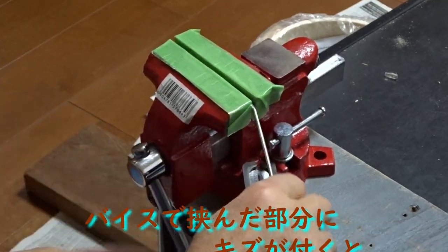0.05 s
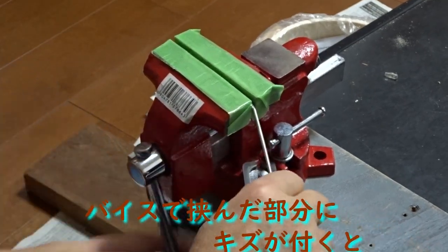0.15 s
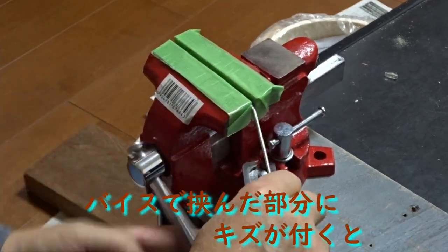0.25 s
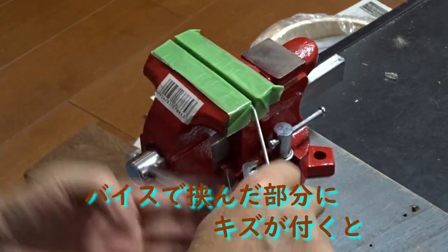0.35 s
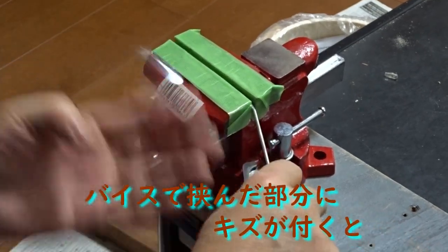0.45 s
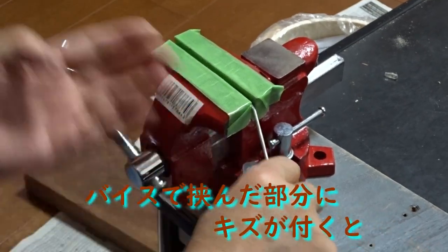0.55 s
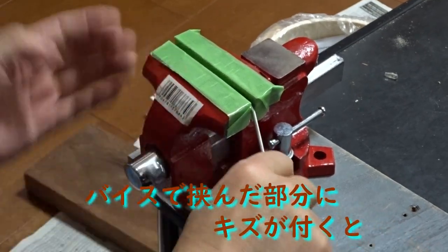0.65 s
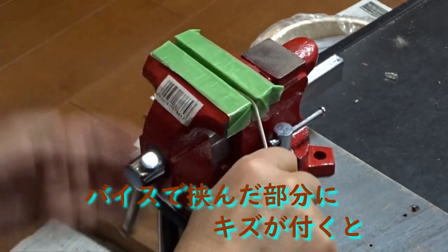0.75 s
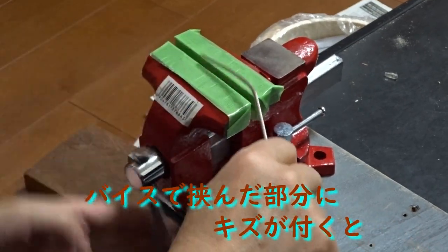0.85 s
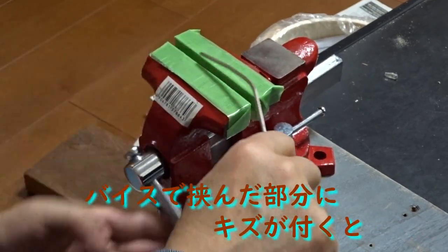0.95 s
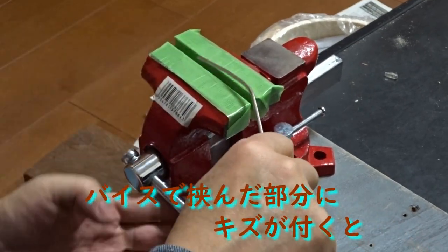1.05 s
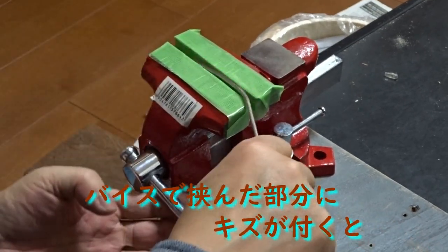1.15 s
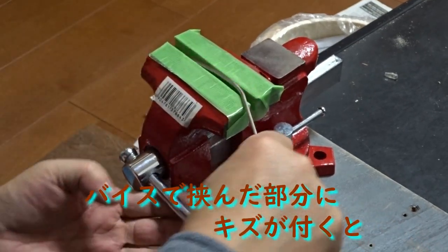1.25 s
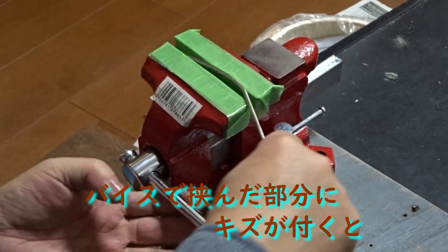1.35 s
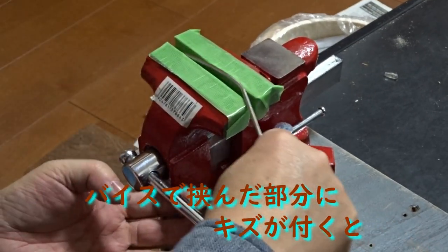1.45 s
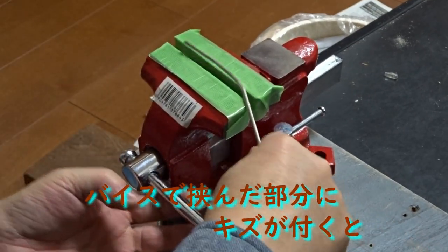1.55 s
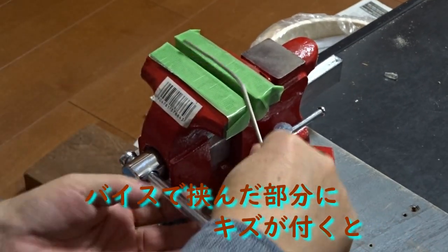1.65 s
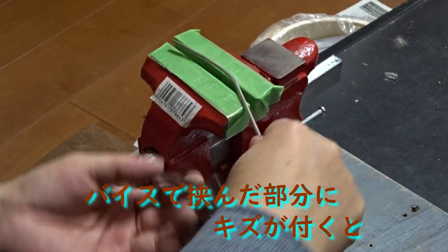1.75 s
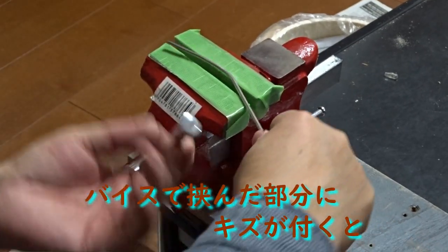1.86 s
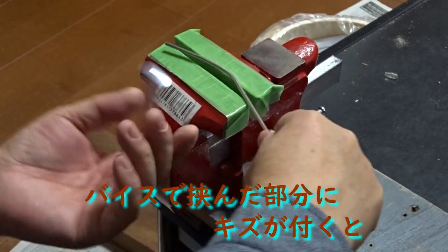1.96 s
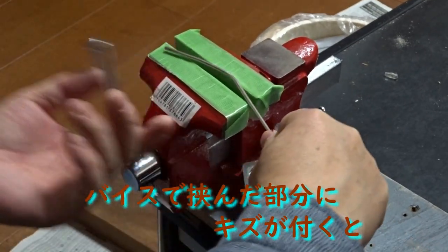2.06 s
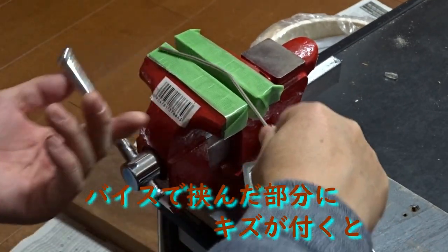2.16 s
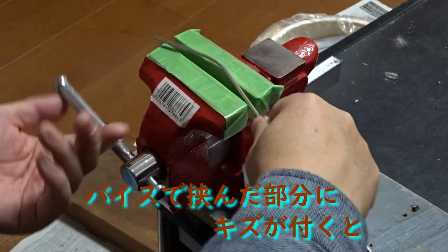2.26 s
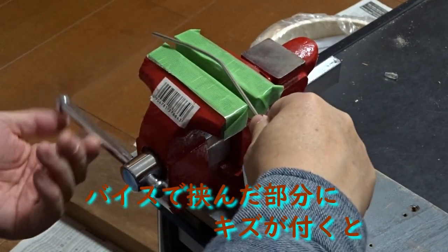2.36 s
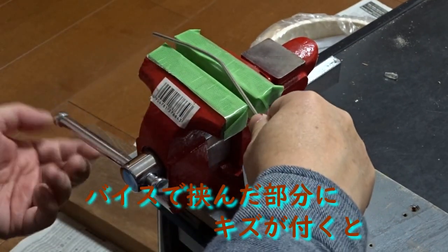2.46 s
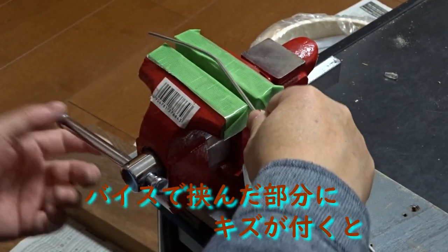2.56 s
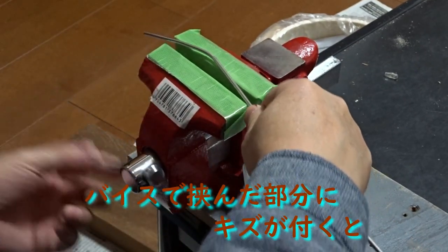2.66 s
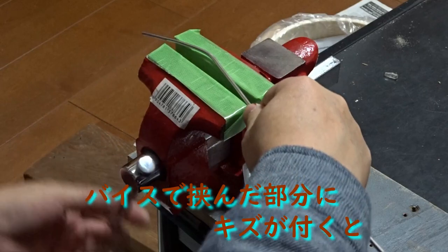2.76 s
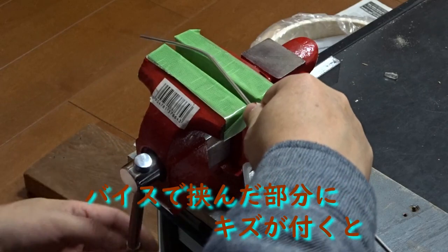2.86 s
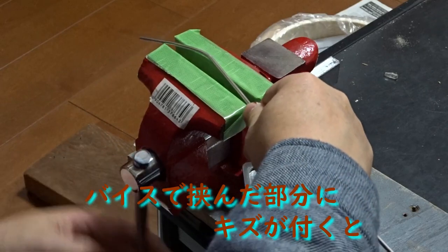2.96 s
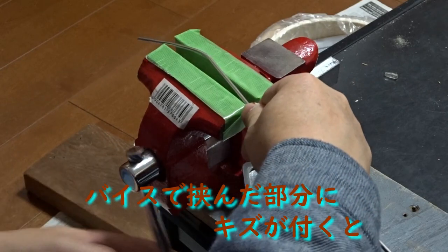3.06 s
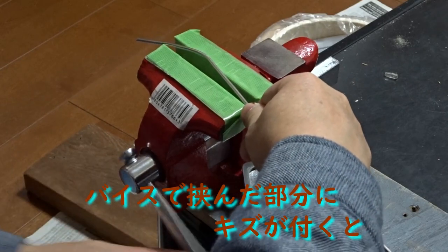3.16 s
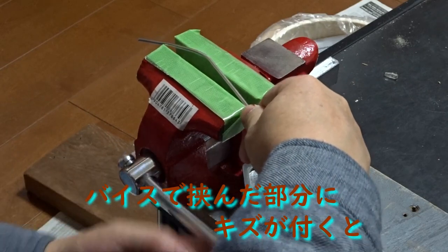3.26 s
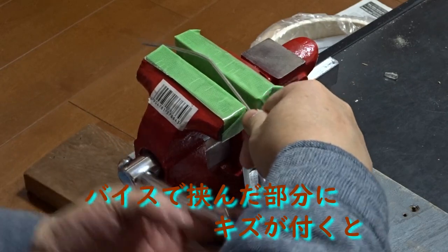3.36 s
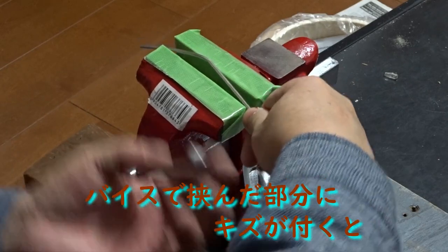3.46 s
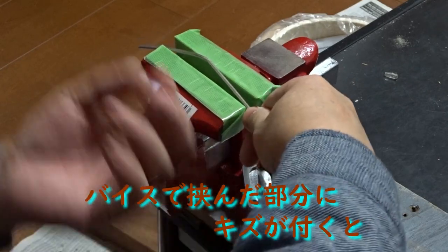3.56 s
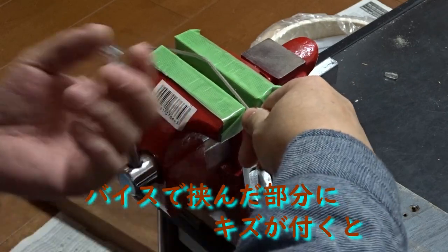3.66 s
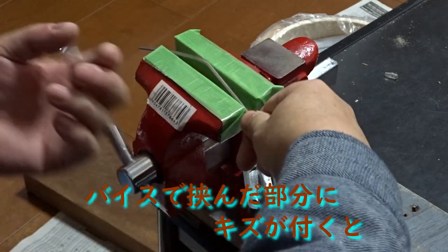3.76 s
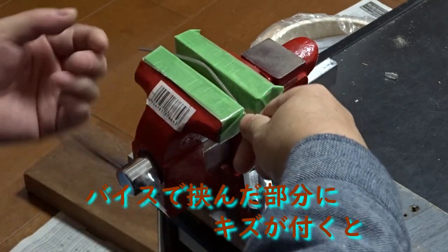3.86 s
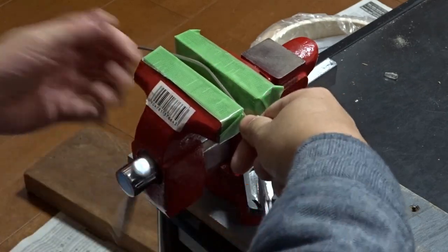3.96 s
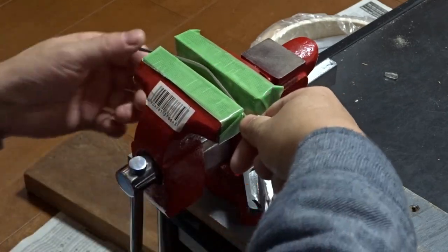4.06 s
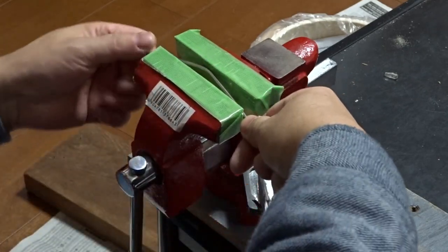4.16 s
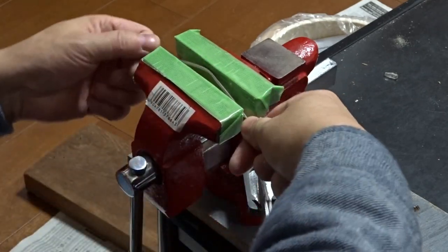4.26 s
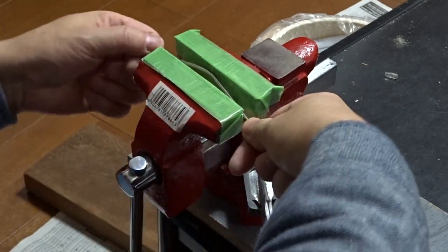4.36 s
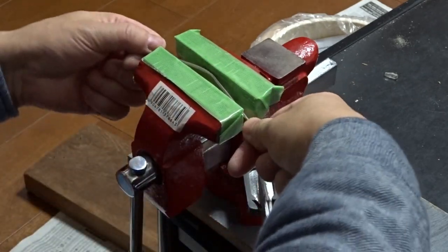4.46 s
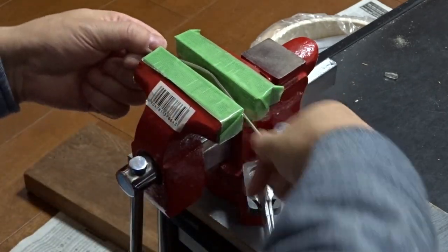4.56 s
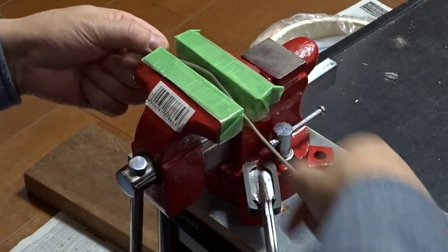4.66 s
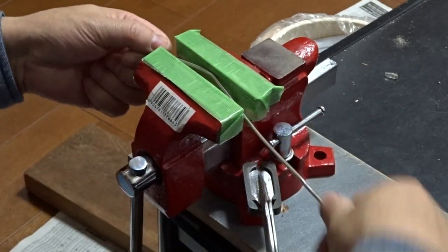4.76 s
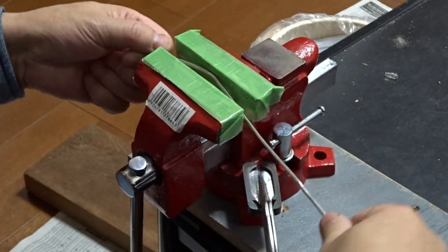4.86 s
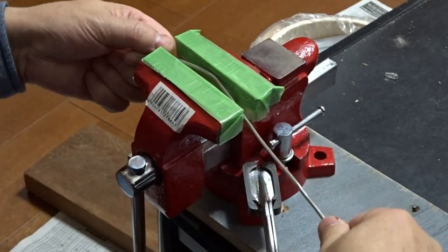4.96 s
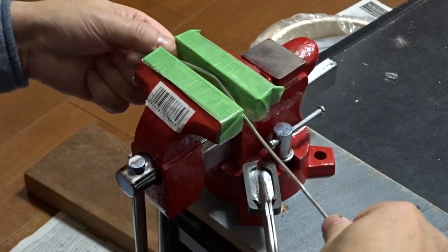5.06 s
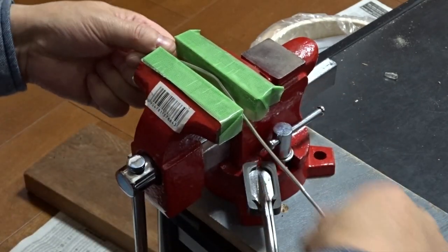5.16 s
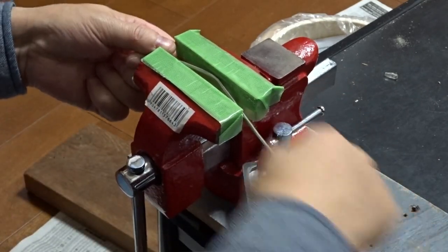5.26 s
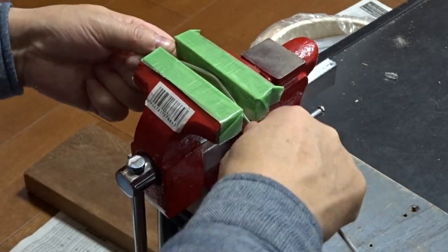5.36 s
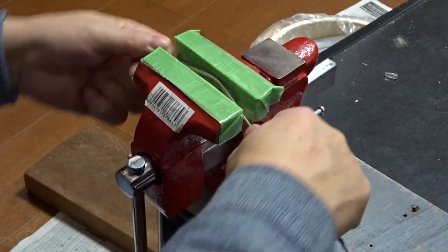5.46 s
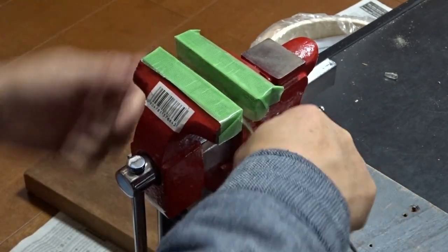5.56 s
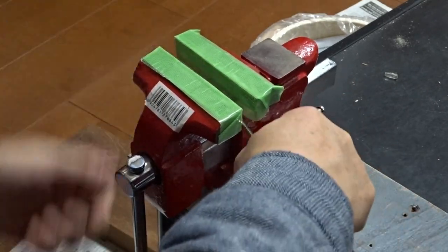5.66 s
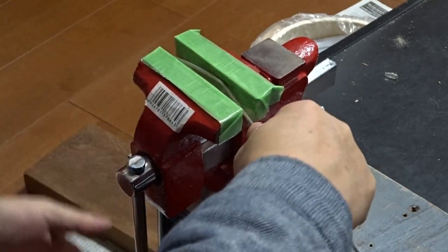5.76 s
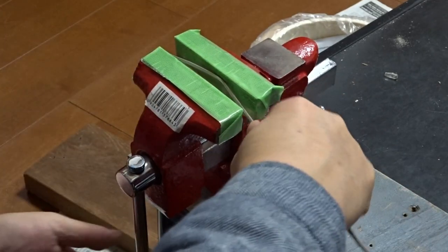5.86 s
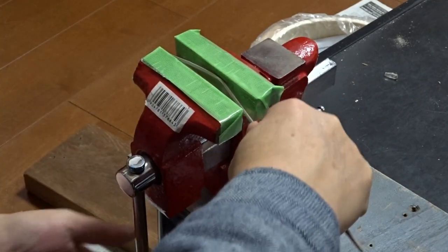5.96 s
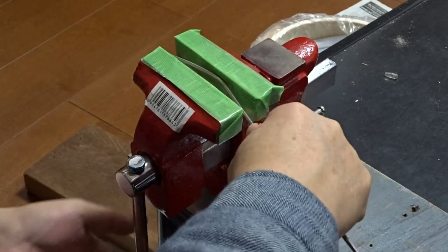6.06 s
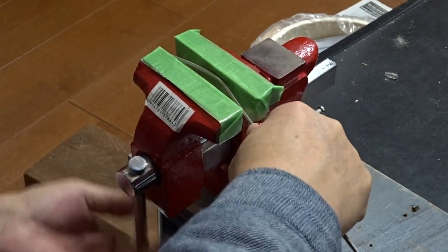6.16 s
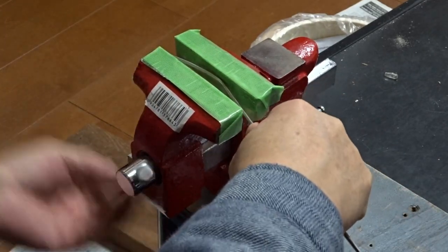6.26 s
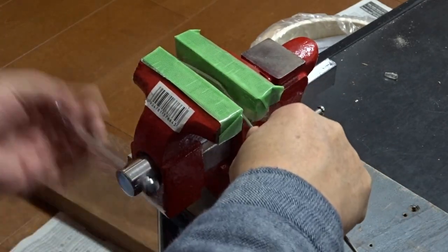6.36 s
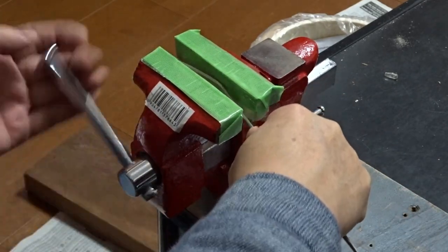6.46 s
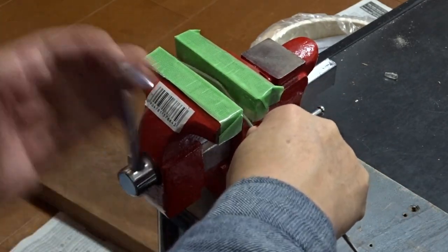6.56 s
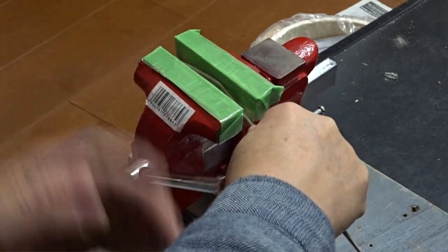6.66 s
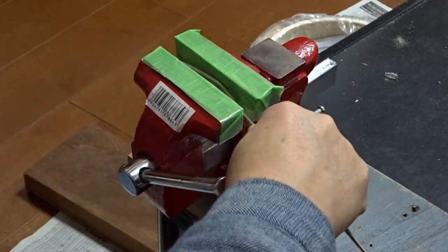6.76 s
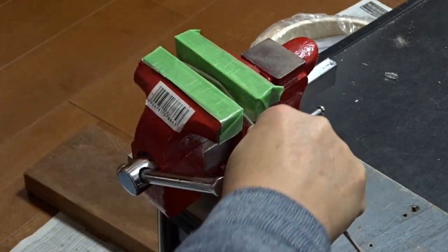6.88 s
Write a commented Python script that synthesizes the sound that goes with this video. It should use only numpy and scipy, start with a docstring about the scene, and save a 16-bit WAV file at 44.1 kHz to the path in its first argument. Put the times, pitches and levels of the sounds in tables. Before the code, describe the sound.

In a small workshop, a cast-iron bench vise is wound open and shut. Its loose steel handle slides and clinks brightly while the jaws knock and the screw grinds softly, shaking a wooden board. After scattered rattles comes a lull with a few thin wire ticks, then another quick flurry of clinks and knocks. The sounds are close, with a short room tail over a faint fan-like hiss.

```python
"""Small workshop: a cast-iron bench vise on a wooden board is wound open and shut.
Its loose steel handle slides and clinks in the screw head. Jaw knocks and the screw grinding in its
nut shake casting and board. A thin wire ticks on the jaws. All of these ring in a short room tail,
over quiet room noise, a narrow fan-like hiss and a thin high whine."""
import sys
import numpy as np
from scipy import signal
from scipy.fft import rfft, irfft
from scipy.io import wavfile
from scipy.ndimage import uniform_filter1d

SR = 44100
rng = np.random.default_rng(int(sys.argv[2]) if len(sys.argv) > 2 else 0)


def to_wav(sig):
    """Store sig (one row per channel, or 1-D mono) as 16-bit WAV at the path in sys.argv[1].

    Samples outside -1..1 are clipped; the rate is SR.
    """
    pcm = np.clip(np.atleast_2d(sig), -1, 1) * 32767
    pcm = np.round(pcm).astype(np.int16)
    wavfile.write(sys.argv[1], SR, pcm.T)  # frames by channels


N = 305303
EVENT_SAMPLES = 8192
STEREO_SIGN = np.array([[1], [-1]])  # left, right

# handle bar and screw head modes, in families low to high: f/Hz, level/dB, t60/s
BAR_MODES = [
    [(2247, -2.5, 0.053), (2512, -3, 0.088), (2770, -19, 0.023)],
    [(3600, -4.5, 0.079), (3764, 1, 0.065), (3844, 4.5, 0.065), (3930, 1.5, 0.06)],
    [(5820, -6, 0.0601), (6598, 4, 0.091), (6710, 5.5, 0.068), (7000, -4, 0.097)],
    [(7500, -1.5, 0.18), (7354, 5.5, 0.079), (7356, 2.5, 0.077), (7704, 4.5, 0.036), (8450, -24.5, 0.021)],
    [(11110, 3, 0.12), (11050, -1, 0.1), (11750, -6, 0.06)],
    [(12640, 2, 0.063), (12710, 5, 0.11), (12950, 0.5, .05)],
]
# handle clinks: t/s, level/dB, hardness/(dB/octave), spot on bar/-1..1, crack re blow/dB, t60 share
CLINKS = [(0.0, -40, -3, -0.027, -22, 1), (.0979, -30.5, -4, 0.68, -25, 0.78),
          (0.1207, -28.5, 4, 0.24, -38, 0.78), (0.1538, -39, 1, 0.99, -28, 0.75),
          (0.1849, -27, -3.5, 0.96, -26, 0.61), (.2039, -25, -2, 0.073, -30, 0.57),
          (0.3013, -40.5, -11.5, -.1, -11, .74), (0.3438, -27.5, -6.5, -.4, -23.5, 1),
          (0.352, -14, 5, -0.74, -22.5, 0.44), (0.367, -14.5, 7.5, .4, -22.5, 0.44),
          (0.3992, -18, 2.5, -0.00014, -31.5, 0.7), (0.4807, -17, -5.5, 1, -31, 0.35),
          (0.6643, -16, -0.5, 0.14, -23, 0.41), (.998, -55, 4.5, -0.15, -25.5, .65),
          (1.073, -27.5, 0.5, 0.16, -31.5, 0.84), (1.1166, -22.5, 14, -0.72, -20, 0.67),
          (1.1339, -26, 20, 0.18, -21, 0.37), (1.916, -32.5, -3.5, -0.16, -20.5, 0.46),
          (2.0768, -41, -0.5, -.6, -28.5, 0.74), (2.7676, -55.5, -2, -0.027, -16.5, 0.57),
          (2.9312, -55, 5, -0.46, -29.5, .69), (3.1333, -59, -2.5, -.3, -26, 0.7),
          (3.3548, -55, -16, -0.18, -18.5, .6), (3.5131, -41.5, -6, -0.18, -17.5, 1),
          (3.552, -36, -4, -0.035, -31, 0.89), (3.7973, -32.5, -1.5, -0.85, -23, 0.67),
          (3.907, -19, 4.5, -0.43, -23.5, 0.34), (3.9214, -27, -1, .7, -27.5, 0.78),
          (5.7167, -53, -9.5, .4, -7.5, .52), (6.142, -42, -8, -.1, -34, .65),
          (6.149, -33.5, -4, -.25, -29, 0.78), (6.1593, -22.5, 3.5, -0.48, -26, 1),
          (6.1769, -15, 0.5, -0.72, -33.5, 0.59), (6.2083, -32.5, 4, -0.17, -29, 0.55),
          (6.2522, -28, -5, -0.17, -20, 0.51), (6.28, -51, -1.5, -.2, -25, 0.58),
          (6.3292, -26, -3.5, -0.13, -27, 0.46), (6.3784, -39, -5, 0.73, -24, 0.74),
          (6.427, -31, 0.5, -0.81, -22.5, 0.41), (6.5286, -52.5, 7, -0.32, -20, 0.97),
          (6.566, -21.5, 6, 0.61, -22, 0.32), (6.5799, -24, -4.5, -0.16, -28, 0.5),
          (6.616, -41.5, -12, 0.2, -9, 0.62), (6.65, -46, -8, .01, -18, .65)]
# per bar family: level/dB; gain at spot +1/dB
BAR_FAMILY_DB = (-19, -17.5, -15.5, -12, -23.5, -24)
BAR_SPOT_DB = (3, -2.4, 8, -6.5, -1, 2.5)
# casting and board modes, in families low to high: f/Hz, level/dB, t60/s
BODY_MODES = [
    [(64.6, 1.5, 0.31), (97, -9, 0.06), (134, 8, 0.35)],
    [(185, 4.5, 0.18), (241.2, 3, 0.21)],
    [(285.4, 2, 0.09), (323.3, 6.5, 0.088), (362.8, 4, 0.18), (445.8, 2, 0.11)],
    [(517.7, 2.5, 0.098), (587.8, 7, 0.077), (655, 0, 0.12), (723.5, 5.5, 0.1)],
    [(843, 4, 0.061), (1005, 5.5, 0.014), (1244, 0, 0.072), (1445, 2, 0.098), (1548, 6.5, 0.066)],
]
# jaw knocks: t/s, level/dB, board boom/dB, jaw edge/dB, spot on casting, t60 share
KNOCKS = [(0.0, -30.5, 1.5, -3.5, -.1, 0.45), (.103, -31.5, -8, 11, -0.26, 0.52),
          (0.188, -28.5, -12, 0.5, -0.37, 0.66), (0.312, -19.5, -19, -3.5, -0.36, 0.41),
          (.348, -26.5, -17, 6.5, -1.4, 1), (.366, -15, -16, -4, -.6, 0.36),
          (.399, -27.5, -4, 3.5, -.9, 0.76), (0.498, -17, -5.5, -7.5, .8, 0.62),
          (.663, -28.5, 7, 17.5, -0.53, 0.33), (.801, -40, 15.5, 3.5, -0.35, 1),
          (.85, -35.5, 13.5, -6, 0.32, 0.57), (1.074, -47, 6, 9.5, -.7, 0.92),
          (1.12, -27, -8, 5.5, -0.024, 0.47), (1.69, -50, 2, -15, 1, 1),
          (1.918, -38.5, 13, 9.5, 0.75, 0.42), (2.02, -38, 1.5, 1.5, 0.22, .82),
          (2.089, -36, 3, 1.5, 0.24, 0.75), (2.768, -41.5, 6.5, 2, -0.23, 0.48),
          (2.931, -29.5, -3, 2.5, 0.98, 0.48), (2.956, -27.5, 6.5, -9.5, 0.48, 0.7),
          (3.135, -32.5, -3.5, -10, 0.11, 0.67), (3.351, -31, -1, -3, -0.35, 0.48),
          (3.55, -34, -4.5, 2, 0.67, 0.93), (3.8, -24.5, -1, -0.5, -0.051, 0.84),
          (3.909, -23, -16, 5.5, -0.7, 0.46), (4.865, -46, 1, -6.5, 1, 1), (5.718, -33, 10, 4, -0.66, 0.91),
          (6.153, -40, -1, 0, 0.96, 0.92), (6.178, -28.5, -4, -0.2, .6, 0.68),
          (6.204, -27, 0, 3, 0.35, 0.67), (6.243, -25, -6, 3.5, 1, 0.67),
          (6.329, -33.5, -32, -3.5, -0.65, 0.97), (6.424, -27.5, 1, 0, -0.04, 0.45),
          (6.528, -42, -4, 2.5, .9, .98), (6.577, -23.5, -3, -7, 0.9, .62), (6.619, -29, 2, -0.5, -0.45, 1)]
# per body family: knock level/dB, gain at spot +1/dB; shares of boom and edge; screw drive/dB
BODY_FAMILY_DB, BODY_SPOT_DB = (-27, -17, -13, -9, -14.5), (-1.8, 0, 4, -2, 3.1)
BOOM_SHARE, EDGE_SHARE = (1, 0.74, 0.17, 0.029, -0.064), (-0.45, -0.1, -0.22, 0.021, 0.93)
GRIT_DB = (-14.5, 1.5, 0.5, 1.5, -6.5)
# screw grinding envelope: t/s, relative level/dB
SCREW_ENVELOPE = [(0, -63), (.1, -52), (0.366, -46), (0.491, -39.5), (0.746, -71), (.864, -49.5),
                  (1.028, -73), (1.7, -72), (2.04, -53), (2.12, -48), (2.26, -70.5), (2.55, -73),
                  (2.706, -53.5), (2.838, -66.5), (3.146, -59), (3.6, -57), (3.8, -50), (4.15, -71),
                  (6.212, -79), (6.344, -45.5), (6.6, -49.5), (6.8, -61.5)]
# room and microphone noise spectrum: f/Hz, relative density/dB
AIR_SPECTRUM = [(15, -43.5), (25, -1.5), (405, -0.5), (1040, -7.5), (1190, -8.5), (1560, -3), (1740, -1),
                (2000, -7), (2840, -15), (14800, -21.5), (16000, -28)]
# hiss resonances: f/Hz, width/Hz, level/dB
HISS_BANDS = [(1208, 63, -70), (1356, 140, -66), (1464, 40, -69.5), (1748.4, 131, -58), (1852, 51, -71)]
# wire ticks: t/s, click peak/dB, f/Hz, scratch re click/dB
WIRE_TICKS = [(4.0851, -41, 12800, -26), (4.0972, -27.5, 12900, -20), (4.653, -62, 4480, -29),
              (4.8535, -46.5, 5360, -16.5), (5.0016, -29.5, 11400, -41), (5.7003, -47, 4630, -31)]
# room tail bands: f/Hz, t60/s, mid level/dB, side level/dB
ROOM_BANDS = [(200, 0.27, 0, -18.5), (600, 0.31, 0, -8.5), (1710, 0.31, 0, -7), (4557, 0.34, -3, -15.5),
              (7960, 0.13, -12.5, -17), (12900, 0.21, -3, -25.5)]


def undb(db):
    return 10 ** (np.asarray(db) / 20)


def level(x, rms_db):
    return x * undb(rms_db) / np.sqrt(np.mean(x ** 2))


def band(x, hz, width_hz):
    edges_hz = [hz - width_hz / 2, min(hz + width_hz / 2, 0.45 * SR)]
    return signal.sosfilt(signal.butter(2, edges_hz, "band", fs=SR, output="sos"), x)


def walk(rate_hz):
    """Random values joined by ramps."""
    hold = int(SR / rate_hz)
    return 0.89 * uniform_filter1d(np.repeat(rng.standard_normal(N // hold + 1), hold), hold)[:N]


def strike(times_s, mix_db, shares, families, contacts_s, detune, scatter_db, rough_db, rough_hz):
    """Blows start each mode at a random size, detuning and phase; loose contact roughens the ring."""
    out, t = np.zeros(N + EVENT_SAMPLES), np.arange(EVENT_SAMPLES) / SR
    hz, mode_db, t60_s = np.concatenate(families).T[..., None]
    family = np.repeat(np.arange(len(families)), [len(modes) for modes in families])
    for start_s, db, share, contact_s in zip(times_s, mix_db, shares, contacts_s):
        scatter, shift, phase = rng.standard_normal((3, len(hz), 1))
        size = undb(db[family, None] + mode_db + scatter_db * scatter)
        envelope = (1 - np.exp(-t / contact_s)) * np.exp(-np.log(1000) * t / (t60_s * share))
        tones = np.sin(2 * np.pi * (hz * (1 + detune * shift) * t + phase))
        out[int(start_s * SR):][:EVENT_SAMPLES] += np.sum(size * envelope * tones, axis=0)
    return out[:N] * undb(rough_db * np.tanh(walk(rough_hz)))


def crack(times_s, levels_db, shares, contacts_s, hz, width_hz, fade_s, gain_db):
    """Pitchless part of each blow: a gritty burst, too dense in modes to ring."""
    envelope, t = np.zeros(N + EVENT_SAMPLES), np.arange(EVENT_SAMPLES) / SR
    for start_s, db, share, contact_s in zip(times_s, levels_db, shares, contacts_s):
        burst = (1 - np.exp(-t / contact_s)) * np.exp(-t / (fade_s * share))
        envelope[int(start_s * SR):][:EVENT_SAMPLES] += undb(db) * burst
    gritty_noise = undb(2.52 * walk(300)) * rng.standard_normal(N)
    return undb(gain_db) * band(envelope[:N] * gritty_noise, hz, width_hz)


def ring(drive, modes):
    """Decaying resonators; rough contact shakes each with its own noise."""
    out = np.zeros(N)
    for hz, db, t60_s in modes:
        radius, angle = np.exp(-np.log(1000) / (t60_s * SR)), 2 * np.pi * hz / SR
        feedback = [1, -2 * radius * np.cos(angle), radius ** 2]
        force = drive * rng.standard_normal(N)
        out += undb(db) * signal.lfilter([0, radius * np.sin(angle)], feedback, force)
    return out


def handle_clinks(pivot_hz=6000, contact_s=0.0029):
    """Bar hits screw head: harder rings brighter; the spot struck rebalances the mode families."""
    times_s, db, hardness, spot, crack_db, shares = np.transpose(CLINKS)
    octaves = np.log2([np.mean(np.array(modes)[:, 0]) / pivot_hz for modes in BAR_MODES])
    mix_db = db[:, None] + BAR_FAMILY_DB + np.outer(hardness, octaves) + np.outer(spot, BAR_SPOT_DB)
    contacts_s = np.full(len(times_s), contact_s)
    ringing = strike(times_s, mix_db, shares, BAR_MODES, contacts_s,
                     detune=0.005, scatter_db=3, rough_db=6, rough_hz=390)
    return ringing + crack(times_s, db + crack_db, shares, contacts_s,
                           hz=5650, width_hz=5200, fade_s=0.023, gain_db=10)


def jaw_knocks(clack_db=-18.5):
    """Jaw blows ring casting and board: boom lifts the lows, edge the top family and the clack."""
    times_s, db, boom_db, edge_db, spot, shares = np.transpose(KNOCKS)
    mix_db = db[:, None] + BODY_FAMILY_DB + np.outer(spot, BODY_SPOT_DB)
    mix_db += np.outer(boom_db, BOOM_SHARE) + np.outer(edge_db, EDGE_SHARE)
    contacts_s = 0.0088 * undb(-0.16 * (db + 23.5))  # weaker blow, longer contact
    ringing = strike(times_s, mix_db, shares, BODY_MODES, contacts_s,
                     detune=0.045, scatter_db=3, rough_db=6, rough_hz=98)
    return ringing + crack(times_s, db + edge_db + clack_db, shares, contacts_s,
                           hz=1259, width_hz=1236, fade_s=0.025, gain_db=21)


def screw_rumble(grains_per_s=300):
    """The gritty screw grinds in its nut and shakes casting and board."""
    grains = 1.0 * (rng.random(N) < grains_per_s / SR)
    times_s, envelope_db = np.transpose(SCREW_ENVELOPE)
    grit = level(grains, -42) * np.interp(np.arange(N) / SR, times_s, undb(envelope_db))
    return sum(ring(undb(db) * grit, modes) for db, modes in zip(GRIT_DB, BODY_MODES))


def board_radiation(x, cutoff_hz=57.6):
    """The small board radiates little deep bass."""
    return signal.sosfilt(signal.butter(2, cutoff_hz, "high", fs=SR, output="sos"), x)


def air(level_db=-57.5, side_db=0.5):
    """Broad room and microphone noise, swelling slightly; bass and top alike left and right."""
    hz, db = np.transpose(AIR_SPECTRUM)
    shape = undb(np.interp(np.log(np.fft.rfftfreq(N, 1 / SR) + 1), np.log(hz), db))
    mid, side = irfft(shape * rfft(rng.standard_normal((2, N))), N)
    side = signal.sosfilt(signal.butter(1, [120, 7000], "band", fs=SR, output="sos"), side)
    return level(mid + undb(side_db) * side * STEREO_SIGN, level_db) * undb(walk(3.2))


def hiss(side_db=-5, pan_db=-3.5, waver_db=2.2):
    """Fan-like noise through narrow resonances, each wavering in level; slightly right."""
    out = 0
    for hz, width_hz, db in HISS_BANDS:
        noise = level(band(rng.standard_normal((2, N)), hz, width_hz), db)
        mid, side = noise * undb(waver_db * walk(7.7))
        out = out + mid + undb(side_db) * side * STEREO_SIGN
    return out * undb(STEREO_SIGN * pan_db / 2)


def whine(hz=15734, rms_db=-79):
    """Thin steady sine."""
    return np.sqrt(2) * undb(rms_db) * np.sin(2 * np.pi * hz * np.arange(N) / SR)


def wire_ticks(scratch_fade_s=0.024):
    """Wire on the jaws: a broad click, then a short duller scratch."""
    out, t = np.zeros(N), np.arange(EVENT_SAMPLES) / SR
    impulse = signal.unit_impulse(EVENT_SAMPLES)
    for start_s, db, hz, scratch_db in WIRE_TICKS:
        click = band(band(impulse, hz, hz), hz, hz)
        click /= np.max(np.abs(click))
        noise = band(rng.standard_normal(EVENT_SAMPLES), 0.75 * hz, width_hz=0.7 * hz)
        scratch = level(noise, scratch_db) * np.exp(-t / scratch_fade_s)
        out[int(start_s * SR):][:EVENT_SAMPLES] += undb(db) * (click + scratch)
    return out


def room(x, build_s=0.0068):
    """Direct sound plus a diffuse tail; a weaker independent side tail adds width."""
    t = np.arange(SR // 2) / SR
    tails = np.zeros((2, len(t)))
    for hz, t60_s, mid_db, side_db in ROOM_BANDS:
        envelope = np.exp(-np.log(1000) * t / t60_s) * (1 - np.exp(-t / build_s))
        envelope /= np.sqrt(np.sum(envelope ** 2))
        noise = envelope * rng.standard_normal(tails.shape)
        tails += undb([[mid_db], [side_db]]) * band(noise, hz, 0.87 * hz)
    mid, side = (signal.fftconvolve(x, tail)[:N] for tail in tails)
    return x + mid + side * STEREO_SIGN


def scene(pan_db=-0.5):
    vise = handle_clinks() + board_radiation(screw_rumble() + jaw_knocks()) + wire_ticks()
    return room(vise) * undb(STEREO_SIGN * pan_db / 2) + air() + hiss() + whine()


def record(dry, cutoff_hz=16100):
    """Steep recorder low-pass."""
    return signal.sosfilt(signal.ellip(10, 0.2, 70, cutoff_hz, fs=SR, output="sos"), dry)


dry = scene()
out = record(dry)
to_wav(out)
```